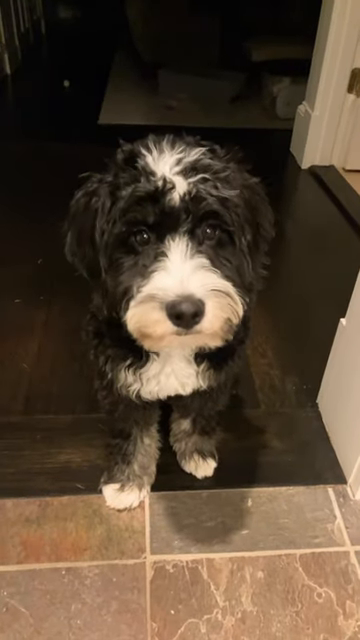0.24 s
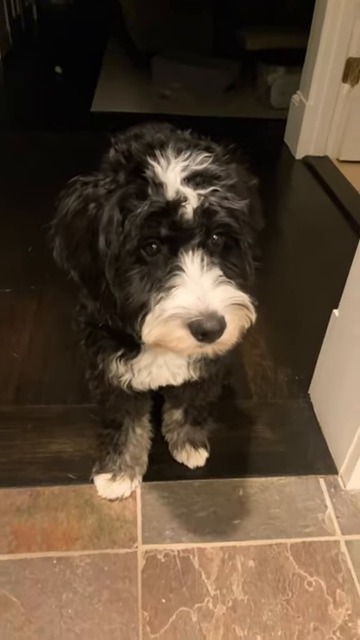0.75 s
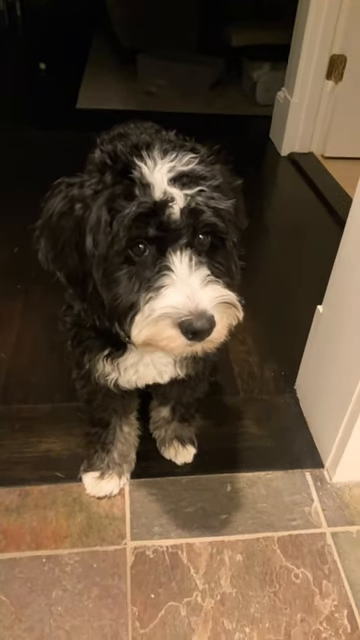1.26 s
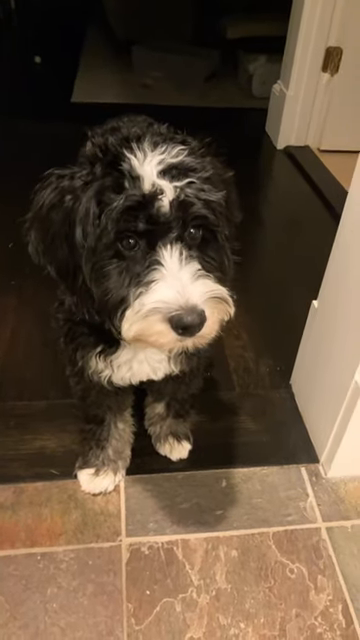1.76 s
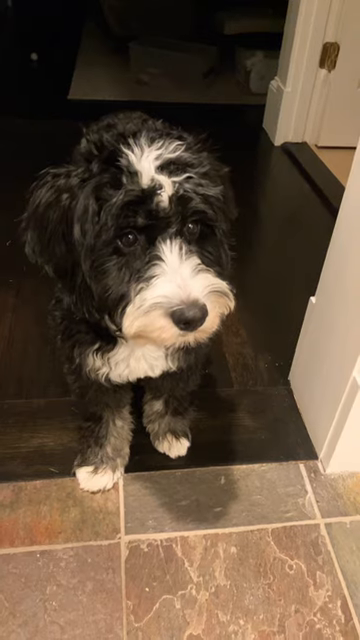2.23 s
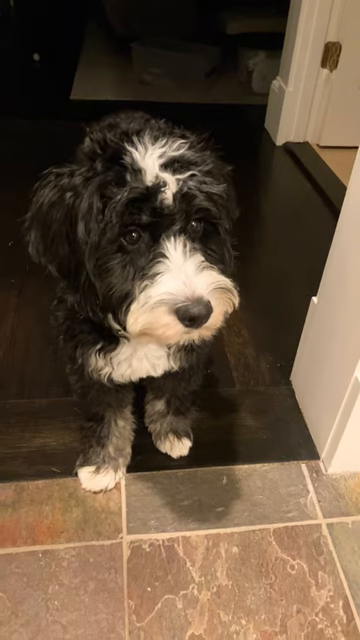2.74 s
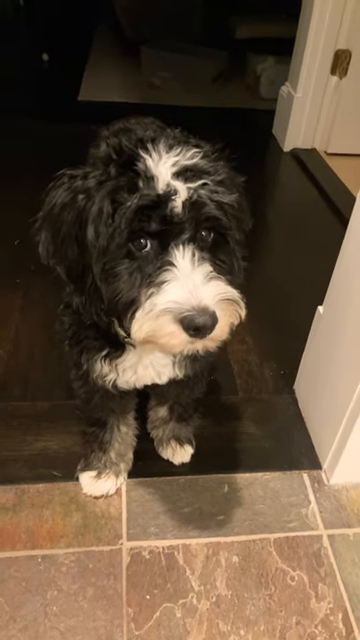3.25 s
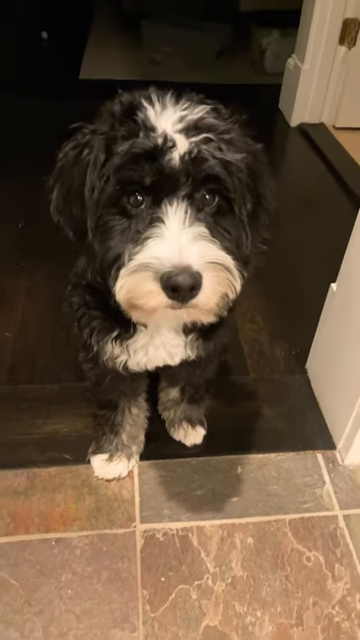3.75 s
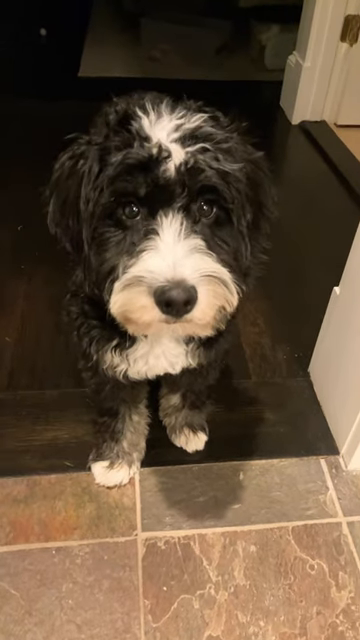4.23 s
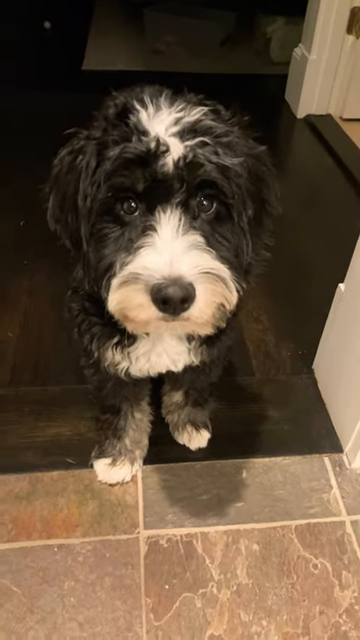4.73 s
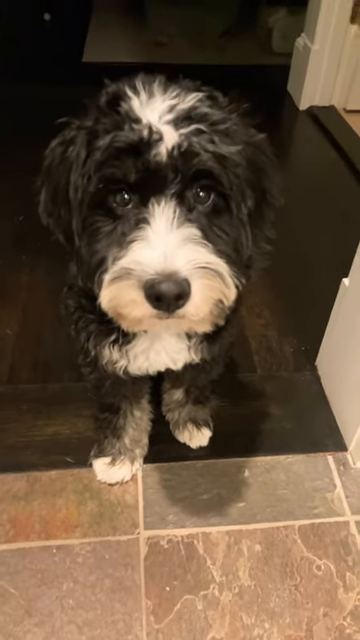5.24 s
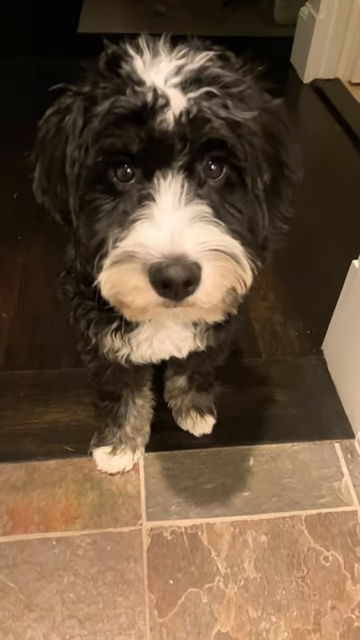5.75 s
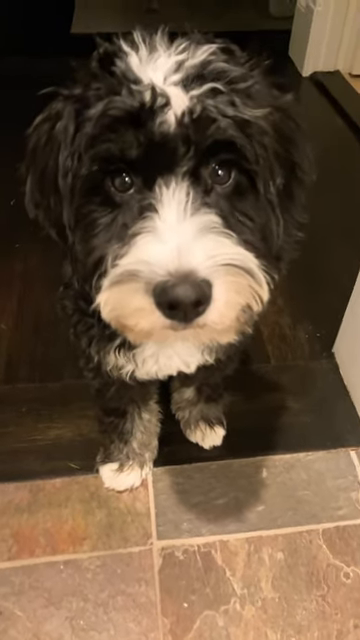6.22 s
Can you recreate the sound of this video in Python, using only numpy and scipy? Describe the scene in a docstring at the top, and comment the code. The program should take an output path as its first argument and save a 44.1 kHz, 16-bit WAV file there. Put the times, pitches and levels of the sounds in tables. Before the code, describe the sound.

Close dog-toy squeaks in a quiet room: three raspy chirps, each followed by a high falling squeal, the last one longest.

```python
"""A quiet room: a rubber dog toy is squeezed three times, close by, as an earlier squeak dies away.
Air pushed out blows one reed (short, harsh); air drawn back in as the rubber recovers blows another
(long, cleaner). Each reed is a sum of overtones whose pitch rises and falls with the pressure.
Shaped noise makes the air rushing around each squeeze; fading sine waves make soft knocks of the rubber.
Behind the toy lie short echoes and a low murmur that dips twice."""
import sys
import numpy as np
from scipy import signal
from scipy.fft import rfft, irfft
from scipy.io import wavfile
from scipy.ndimage import uniform_filter1d

SR = 44100
rng = np.random.default_rng(int(sys.argv[2]) if len(sys.argv) > 2 else 0)


def pcm_store(signal):
    """Save signal as 16-bit PCM."""
    levels = np.round(np.clip(np.atleast_2d(signal), -1, 1) * 32767)
    wavfile.write(sys.argv[1], SR, levels.astype(np.int16).T)


N = 285900
TIME = np.arange(N) / SR  # s

# outward reed, one row per squeeze: (start [s], stop [s], swing [dB], swing slope [dB per octave],
# slap [dB], pitch of the hardest slap [Hz], slap loss [dB per octave squared],
# steady rasp before limiting [dB], drift of the level [dB per s])
SQUEEZES = [(1.048, 1.232, -27, -2.5, -14, 1550, 13.5, -12.5, -29),
            (2.588, 2.841, -25, -1.5, -12.5, 1393, 19.5, -16, -14.5),
            (4.526, 4.906, -18.5, 20.5, -15, 1131, 62.5, -36.5, -0.5)]
# inward reed, one row per release, the first already under way: (same columns and units as SQUEEZES)
RELEASES = [(-.3, 0.042, -19.5, 27.5, -22, 1500, 39, -16.5, 0),
            (1.274, 1.813, -22.5, 13, -17, 1660, 43, -26, 5),
            (2.875, 3.647, -24, 9.2, -18, 1570, 37.67, -25.5, -2.5),
            (5.283, 6.602, -21.5, 10.5, -20, 1601, 60.6, -47.5, -3)]
# the pitch follows the hand's pressure in each squeeze: (time [s], pitch [Hz])
PRESS_1 = [(1.05, 1009), (1.054, 1023), (1.082, 1450), (1.092, 1517), (1.114, 1568), (1.146, 1219),
           (1.154, 1257), (1.232, 857)]
PRESS_2 = [(2.59, 957), (2.61, 1046), (2.658, 1170), (2.668, 1304), (2.722, 1261), (2.78, 1281),
           (2.83, 926), (2.836, 872)]
PRESS_3 = [(4.528, 918), (4.59, 1029), (4.636, 1063), (4.674, 1069), (4.706, 1044), (4.79, 922), (4.9, 815)]
# let go, the rubber springs back and the pitch leaps to a high arch: (leap time [s], top pitch [Hz])
REBOUNDS = [(1.314, 1917), (2.917, 1882), (5.34, 1904)]
# then the pitch sinks, unevenly, as the toy slowly refills: (time [s], pitch [Hz])
REFILL_0 = [(0, 1236), (.04, 1036)]
REFILL_1 = [(1.468, 1570), (1.484, 1527), (1.572, 1418), (1.614, 1324), (1.682, 1236), (1.764, 1266),
            (1.808, 1079)]
REFILL_2 = [(3.058, 1565), (3.14, 1489), (3.298, 1441), (3.43, 1202), (3.498, 1161), (3.606, 1207),
            (3.626, 1166), (3.644, 1070)]
REFILL_3 = [(5.474, 1525), (5.604, 1356), (5.658, 1317), (5.814, 1254), (5.958, 1263), (5.976, 1279),
            (6.066, 1276), (6.184, 1227), (6.306, 1203), (6.47, 1253)]
# colour each reed gets from its tube, relative: (frequency [Hz], level [dB])
OUT_TUBE = [(850, -7.5), (1100, -11.5), (1600, -6.5), (2100, -9), (2900, -7.5), (3600, -14.5), (4300, -10),
            (5200, -5), (6400, -5), (7500, 3.5), (8600, -8.5), (10100, -9), (11300, -22.5), (12700, -20),
            (15000, -29)]
IN_TUBE = [(1100, -2.5), (1450, -1.5), (1900, -1.5), (2600, -4.5), (3500, -14), (4400, -8), (5400, -4),
           (6200, -9.5), (7200, -9.5), (8900, 1), (10300, 1.5), (11600, -25), (13300, -18.5), (15300, -16)]
# the same once the hand has shifted its grip and covers the tube differently: (frequency [Hz], level [dB])
OUT_TUBE_REGRIPPED = [(820, -9.5), (1060, -7.5), (1650, -7), (2100, -6), (2800, -7.5), (3350, -19.5),
                      (4250, -13), (5300, -9.5), (6400, -7), (7400, 1.5), (8400, -12), (9600, -15),
                      (10800, -24.5), (15000, -30.5)]
IN_TUBE_REGRIPPED = [(1200, 1.5), (1900, 5.5), (2450, 1.5), (3000, 3), (3550, -15.5), (3900, -5),
                     (5600, -5), (6200, -9.5), (7200, -13), (7700, 1.5), (10100, -1.5), (11400, -19.5),
                     (13500, -20.5), (15300, -14)]
# colour of the rushing air, relative: (frequency [Hz], level [dB per Hz])
OUT_AIR = [(300, -17.5), (1000, -20), (3000, -26), (4500, -21), (5600, -18.5), (6600, -8), (7500, 2.5),
           (8400, -11.5), (10300, -12.5), (11500, -18.5), (13000, -20.5), (16000, -27.5)]
IN_AIR = [(300, -21), (1400, -19), (3000, -26), (4200, -25), (5200, -6.5), (7500, -10.5), (9500, -14),
          (10800, -2.5), (12000, -35.5), (15000, -18.5)]
# brief warbles where the reed nearly jumps to another mode:
# (time [s], half length [s], frequency [Hz], level [dB])
WARBLES = [(1.126, .012, 7620, -17), (1.543, 0.019, 6050, -32), (1.575, 0.009, 7050, -37.5),
           (2.63, 0.0085, 7860, -23.5), (2.922, 0.018, 5100, -27.5), (3.356, 0.037, 7300, -38),
           (5.57, 0.017, 7580, -33)]
# air rushing around each squeeze: (lead [s], level before [dB], trail [s], level at the end of the squeeze [dB])
RUSHES = [(.039, -33, 0.048, -45), (0.064, -34, .035, -46), (.187, -38.5, .17, -48.5)]
# soft knocks of the rubber wall: (time [s], peak [dB], frequency [Hz])
KNOCKS = [(1.05, -37.5, 433), (2.59, -34, 440), (4.525, -45, 488), (4.999, -40.5, 256.3), (5.261, -42, 311),
          (5.283, -50.5, 305)]
# how long the echoes take to fade by 60 dB: (frequency [Hz], time [s])
ROOM_T60 = [(200, 0.69), (1000, 0.11), (4000, 0.11), (9000, 0.037), (16000, .2)]
# colour of the room's murmur, relative: (frequency [Hz], level [dB per Hz])
ROOM_TONE = [(30, -4), (80, -4.5), (140, -1), (230, -1.5), (350, -9), (700, -15.5), (1400, -22),
             (3000, -28.5), (6000, -32), (14000, -35.5)]
# the murmur dips briefly: (time [s], half length [s], depth [dB])
DROPOUTS = [(0.394, 0.039, 15), (4.023, 0.086, 48)]

# pitch where a release starts, where it leaps, and at both ends of the arch (Hz)
START_HZ, BREAK_HZ, SHOULDER_HZ = 1266, 1600, 1853
LEAP_S, FALL_S = 0.019, .048  # time to leap up to the arch, and to fall off it
# the outward reed breaks register at this pitch; the hand eases off over this time
OUT_BREAK_HZ, EASE_OFF_S = 1200, .055
# around the break, half length and loss of slap as the reed loses its grip
BREAK_S, BREAK_LOSS_DB = .013, 4
# as a reed starts and stops, swing and slap follow these powers of the air flow
SWING_POWER, SLAP_POWER = 0.25, 0.47
# a reed rasps while it catches and again as it stalls: time scales
CATCH_S, STALL_S = 0.049, .014
CALM_GLIDE = .35  # octaves per s; slower glides add no rasp
# the slap sways at random: spread at full rasp, and fastest rate
SWAY_DB, SWAY_HZ = 2.5, 25
RUSH_ONSET_DB = -56.5  # the rush sets in at this level
ROOM_DB = -20.5  # echoes against the toy
# murmur level; its bass sinks as the toy passes the threshold
ROOM_TONE_DB, DUCK_THRESHOLD_DB, DUCK_BELOW_HZ = -61.5, -18.5, 280
CUTOFF_HZ = 15700
DC_OFFSET = -.0064  # constant shift of the waveform, full scale = 1


def squeeze(row, curve, tube):
    """The outward reed, driven hard by the hand."""
    drive = blow(row, curve, attack_s=0.001, fade_s=EASE_OFF_S, break_hz=OUT_BREAK_HZ,
                 break_rasp_db=-0.5, rise_rasp_db=-30, fall_rasp_db=-24.5, catch_db=-11.5, stall_db=-8)
    return reed(drive, tube, OUT_AIR, flicker_db=3, hiss_db=6, brighten=0.89, side_db=-10.5,
                wobble=.026, jitter=.17, jitter_hz=450, side_shift_hz=7000)


def release(row, curve, tube):
    """The inward reed, driven by the rubber springing back."""
    drive = blow(row, curve, attack_s=0.0099, fade_s=0.02, break_hz=BREAK_HZ,
                 break_rasp_db=-6, rise_rasp_db=-25.5, fall_rasp_db=-26.5, catch_db=-4.5, stall_db=-13.5)
    return reed(drive, tube, IN_AIR, flicker_db=4.5, hiss_db=0.5, brighten=0.24, side_db=-15.5,
                wobble=.016, jitter=.14, jitter_hz=380, side_shift_hz=9400)


def rebound(start_s, leap_s, top_hz, refill):
    """Pitch of a whole release: climb, leap, arch, then a fall into the slow refill with rounded bends."""
    arch_s = np.linspace(leap_s + LEAP_S, refill[0][0] - FALL_S, 9)
    arch_hz = top_hz - (top_hz - SHOULDER_HZ) * np.linspace(-1, 1, 9) ** 2
    refill_s = np.linspace(refill[0][0], refill[-1][0], 100)
    refill_hz = np.interp(refill_s, *np.transpose(refill))
    refill_hz[3:-3] = uniform_filter1d(refill_hz, size=7)[3:-3]
    return [(start_s, START_HZ), (leap_s, BREAK_HZ), *zip(arch_s, arch_hz), *zip(refill_s, refill_hz)]


def blow(row, curve, attack_s, fade_s, break_hz, break_rasp_db, rise_rasp_db, fall_rasp_db, catch_db, stall_db):
    """One flow of air through a reed: its samples, and the pitch, swing, slap and rasp that go with it."""
    start, stop, swing_db, swing_slope, slap_db, best_hz, slap_loss, steady_db, drift_db_per_s = row
    span = np.flatnonzero((TIME > start) & (TIME < stop))
    t = TIME[span]
    # the air in the toy is a cushion: pressure, and so pitch, turns smoothly
    pitch = uniform_filter1d(np.interp(t, *np.transpose(curve)), size=SR // 70, mode="nearest")
    octaves = np.log2(pitch / best_hz)
    glide = np.gradient(octaves) * SR  # octaves per s

    # on first passing the break pitch, the reed jumps register and briefly loses its grip
    break_time = t[np.argmax(pitch > break_hz)]
    breaking = np.exp(-((t - break_time) / BREAK_S) ** 2) * (pitch.max() > break_hz)

    flow = np.minimum((t - start) / attack_s, (stop - t) / fade_s)
    flow_db = 20 * np.log10(np.clip(flow, 1e-3, 1))
    effort_db = drift_db_per_s * (t - t.mean())
    # the swing changes steadily with pitch; the slap is hardest at one pitch and weaker either side
    swing_db = swing_db + swing_slope * octaves + SWING_POWER * flow_db + effort_db
    slap_db = slap_db - slap_loss * octaves ** 2 + SLAP_POWER * flow_db + effort_db
    slap_db = slap_db - BREAK_LOSS_DB * breaking

    # the faster the pitch glides, the rougher the reed
    glide_rasp = from_db(np.where(glide > 0, rise_rasp_db, fall_rasp_db))
    rasp = from_db(steady_db) + np.maximum(abs(glide) - CALM_GLIDE, 0) * glide_rasp
    rasp = rasp + from_db(catch_db) * np.exp((start - t) / CATCH_S)
    rasp = rasp + from_db(stall_db) * np.exp((t - stop) / STALL_S)
    sway_db = SWAY_DB * np.sqrt(np.minimum(rasp, 1)) * flutter(SWAY_HZ)[span]
    return span, pitch, swing_db, slap_db + sway_db, rasp + from_db(break_rasp_db) * breaking


def reed(drive, tube, air, wobble, jitter, jitter_hz, flicker_db, hiss_db, brighten, side_db, side_shift_hz):
    """A beating reed: its swing gives the two lowest partials, its slap on the seat all the higher ones."""
    span, pitch, swing_db, slap_db, rasp = drive
    # even at its roughest the reed never loses its beat
    rasp = .5 * np.tanh(2 * rasp)
    # an unsteady reed wanders in pitch and shuts a little early or late
    pitch = pitch * (1 + wobble * rasp * flutter(180)[span])
    phase = 2 * np.pi * np.cumsum(pitch) / SR + jitter * rasp * flutter(jitter_hz)[span]
    k = np.arange(1, 20)[:, None]  # partial numbers
    hz = k * pitch

    # the harder the slap compared with the swing, the sharper the closure and the brighter its overtones
    tilt_db = brighten * (slap_db - swing_db - 6.0) * np.log2(k / 3)
    # the shape of the closure changes too, so each overtone flickers on its own
    unrest_db = flicker_db * np.sqrt(rasp) * np.resize(flutter(130), (len(k), len(span)))
    height = from_db(at_hz(tube, hz) + (tilt_db + unrest_db) * (k > 2))
    height = height * np.clip((19000 - hz) / 3000, 0, 1)  # fade out before the highest usable frequency
    partials = height * np.cos(k * phase + tube_phase(tube, hz))
    # each group is brought to unit power
    swing = partials[:2].sum(0) / np.sqrt((height[:2] ** 2).sum(0) / 2)
    slap = partials[2:].sum(0) / np.sqrt((height[2:] ** 2).sum(0) / 2)

    # mostly a really rough reed slaps unevenly and lets turbulent puffs of air through
    turmoil = rasp ** 1.8
    slap = slap * (1 + .4 * turmoil * flutter(600, slowest_hz=200)[span])
    hiss_share = from_db(hiss_db) * turmoil
    narrow_slot = signal.butter(4, 4400, "high", fs=SR, output="sos")
    puffs = noise(air)[span] * (1 + .5 * np.cos(phase))
    hiss = hiss_share * signal.sosfilt(narrow_slot, puffs)

    # side tones: overtones shifted down by a constant step and coloured like the air
    side_hz = hz - side_shift_hz
    audible = np.clip(side_hz / 1000, 0, 1) * (side_hz < SR * .4)
    side_phase = k * phase - 2 * np.pi * side_shift_hz * TIME[span]
    side_tones = np.sum(audible * from_db(at_hz(air, side_hz)) * np.cos(side_phase), axis=0)
    slap = slap + from_db(side_db) * np.sqrt(rasp) * side_tones

    out = np.zeros(N)
    out[span] = from_db(swing_db) * swing + from_db(slap_db) * (slap + hiss) / np.sqrt(1 + hiss_share ** 2)
    return out


def tube_phase(tube, hz):
    """Phase lag of a tube that only rings after each closure of the reed, never before it."""
    size = 2048
    grid = np.arange(size + 1) * SR / (2 * size)
    # folding the cepstrum onto positive times gives the phase that belongs to this colour
    cepstrum = irfft(np.log(from_db(at_hz(tube, grid))))
    return np.interp(hz, grid, rfft(2 * cepstrum[:size], 2 * size).imag)


def warbles(width_hz):
    """Where a reed nearly jumps to another mode, a narrow, unsteady tone swells and fades."""
    out = np.zeros(N)
    in_phase, quadrature = flutter(width_hz), flutter(width_hz)
    for s, half_s, hz, level_db in WARBLES:
        span = np.flatnonzero(abs(TIME - s) < 3 * half_s)
        turn = 2 * np.pi * hz * TIME[span]
        swell = from_db(level_db) * np.exp(-((TIME[span] - s) / half_s) ** 2)
        out[span] += swell * (in_phase[span] * np.cos(turn) + quadrature[span] * np.sin(turn))
    return out


def rushing_air():
    """Air hissing through the outward squeaker, coloured by its tube: swells before a squeeze, ebbs after."""
    level = np.zeros(N)
    for (start, stop, *_), (lead_s, before_db, trail_s, after_db) in zip(SQUEEZES, RUSHES):
        leading = (TIME > start - lead_s) & (TIME < start)
        level += leading * from_db(np.interp(TIME, [start - lead_s, start], [RUSH_ONSET_DB, before_db]))
        # under the reed a second hiss builds up until the squeeze ends
        level += from_db(after_db) * np.interp(TIME, [start, stop, stop + trail_s], [0, 1, 0])
    return level * noise(OUT_AIR)


def rubber_knocks(t60):
    """The wall flexes under the fingers: each knock is a sine that falls by 60 dB in t60 seconds."""
    out, t = np.zeros(N), TIME[:SR // 10]
    for s, level_db, hz in KNOCKS:
        start = int(s * SR)
        out[start:start + len(t)] += from_db(level_db - 60 * t / t60) * np.sin(2 * np.pi * hz * t)
    return out


def room(x, wall_gap_s, dull_hz):
    """Scattered echoes from the walls, made of noise bands that each die away at their own rate."""
    t = TIME[:SR // 2]
    edges = np.geomspace(150, 16000, 9)
    tail = 0
    for low, high in zip(edges, edges[1:]):
        band_filter = signal.butter(2, [low, high], "band", fs=SR, output="sos")
        band = signal.sosfilt(band_filter, rng.standard_normal(len(t)))
        centre = np.sqrt(low * high)
        tail = tail + band * from_db(-60 * t / at_hz(ROOM_T60, centre)) / np.hypot(1, centre / dull_hz)
    tail = tail * (t > wall_gap_s)  # nothing returns before the first echo
    return signal.fftconvolve(x, tail / np.sqrt(np.sum(tail ** 2)))[:N]


def room_tone(toy):
    """A low murmur of the house that dips briefly; its bass is turned down while the toy is loud."""
    dip_db = sum(depth_db * np.exp(-abs((TIME - s) / half_s) ** 3) for s, half_s, depth_db in DROPOUTS)
    tone = noise(ROOM_TONE)
    bass = signal.sosfiltfilt(signal.butter(2, DUCK_BELOW_HZ, fs=SR, output="sos"), tone)
    toy_power = uniform_filter1d(toy ** 2, size=SR // 10)
    duck = 1 / (1 + toy_power / from_db(DUCK_THRESHOLD_DB) ** 2)
    return from_db(ROOM_TONE_DB - dip_db) * (tone - bass + duck * bass)


def noise(spectrum):
    """Coloured noise of unit power."""
    hz = np.arange(N // 2 + 1) * SR / N
    return rms_one(irfft(rfft(rng.standard_normal(N)) * from_db(at_hz(spectrum, hz)), N))


def flutter(rate_hz, slowest_hz=5):
    """Random unsteadiness between two rates; spread 1."""
    rates = [slowest_hz, np.clip(rate_hz, 2 * slowest_hz, SR / 4)]
    band = signal.butter(4, rates, "band", fs=SR, output="sos")
    return rms_one(signal.sosfilt(band, rng.standard_normal(N)))


def from_db(db):
    """Decibels to gain."""
    return 10 ** (np.asarray(db) / 20)


def rms_one(x):
    """Scale to unit power."""
    return x / np.sqrt(np.mean(x ** 2) + 1e-20)


def at_hz(points, hz):
    """Read a table at any frequency, in even steps per octave."""
    f, value = np.transpose(points)
    return np.interp(np.log(np.maximum(hz, 1)), np.log(f), value)


def scene():
    """Both reeds, the air and the rubber as one centred source, with echoes and the murmur."""
    squeeze_tubes = (OUT_TUBE, OUT_TUBE, OUT_TUBE_REGRIPPED)
    squeezes = sum(map(squeeze, SQUEEZES, (PRESS_1, PRESS_2, PRESS_3), squeeze_tubes))
    refills = (REFILL_1, REFILL_2, REFILL_3)
    curves = [rebound(row[0], *leap, refill) for row, leap, refill in zip(RELEASES[1:], REBOUNDS, refills)]
    release_tubes = (IN_TUBE, IN_TUBE, IN_TUBE, IN_TUBE_REGRIPPED)
    releases = sum(map(release, RELEASES, [REFILL_0, *curves], release_tubes))
    toy = squeezes + releases + warbles(width_hz=840) + rushing_air() + rubber_knocks(t60=0.031)
    echoes = from_db(ROOM_DB) * room(toy, wall_gap_s=0.018, dull_hz=13940)
    mono = toy + echoes + room_tone(toy)
    return np.stack([mono, mono])


def record(dry):
    """The converter sits slightly off zero; the top is cut steeply."""
    top_cut = signal.ellip(10, .1, 70, CUTOFF_HZ, fs=SR, output="sos")
    return DC_OFFSET + signal.sosfilt(top_cut, dry)


dry = scene()
out = record(dry)
pcm_store(out)
```